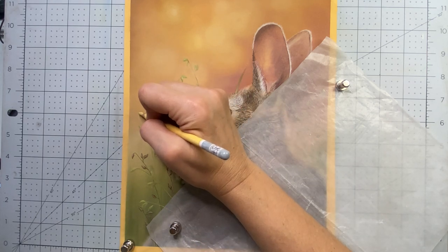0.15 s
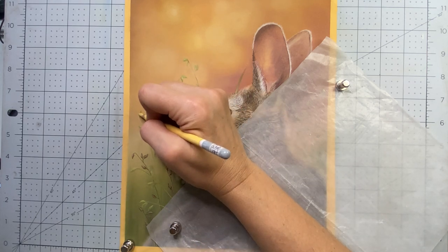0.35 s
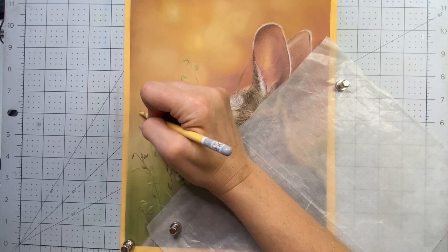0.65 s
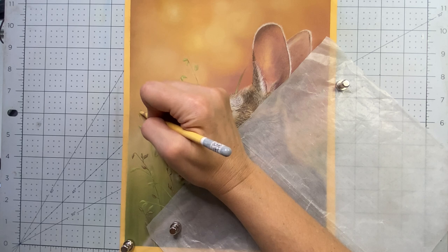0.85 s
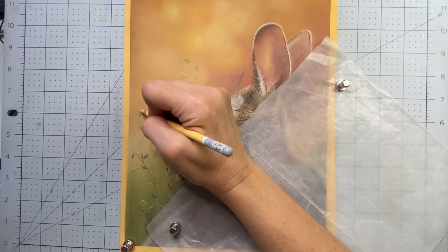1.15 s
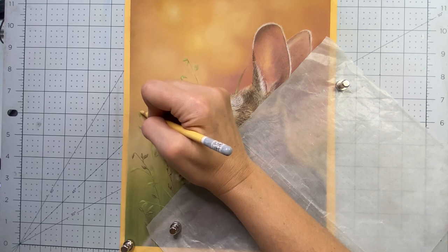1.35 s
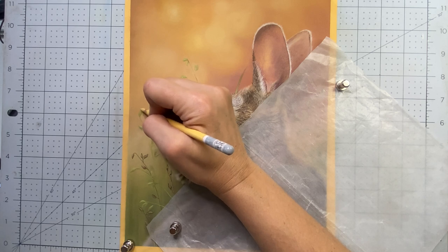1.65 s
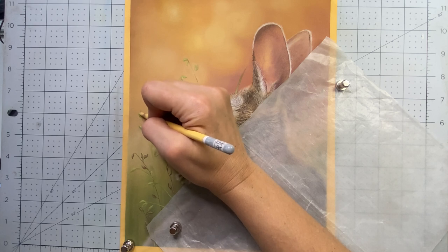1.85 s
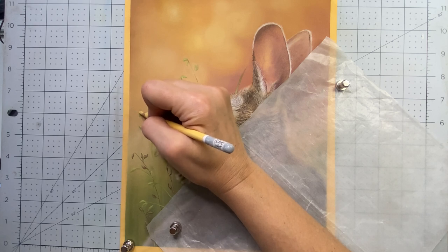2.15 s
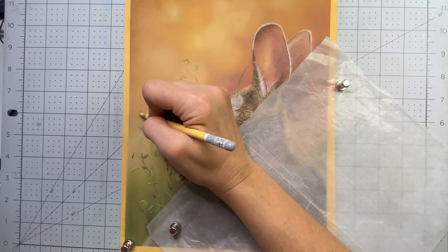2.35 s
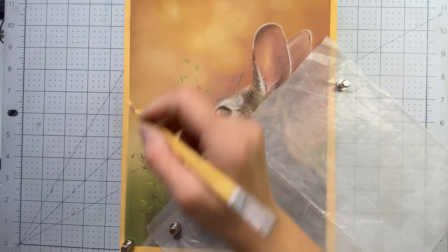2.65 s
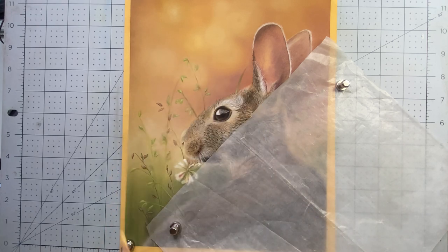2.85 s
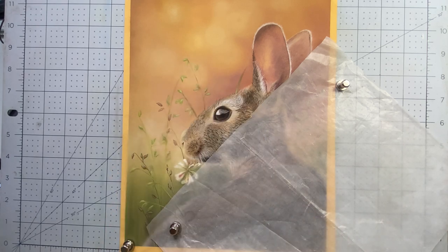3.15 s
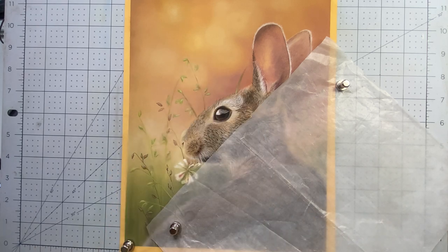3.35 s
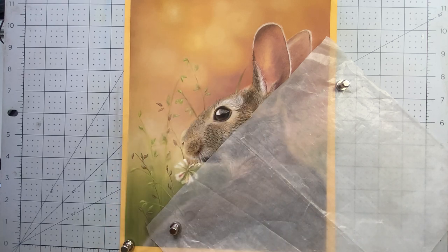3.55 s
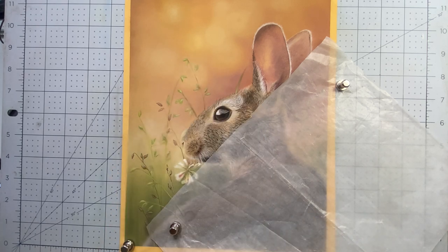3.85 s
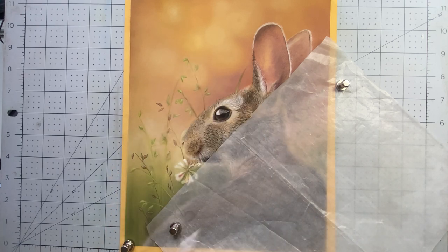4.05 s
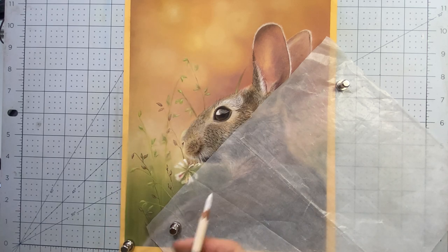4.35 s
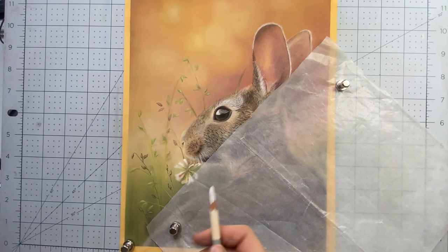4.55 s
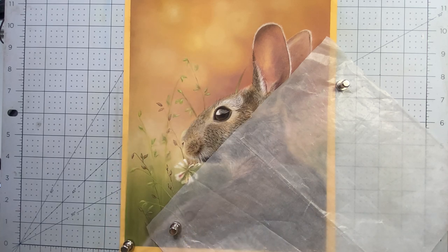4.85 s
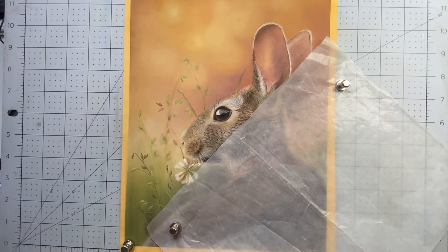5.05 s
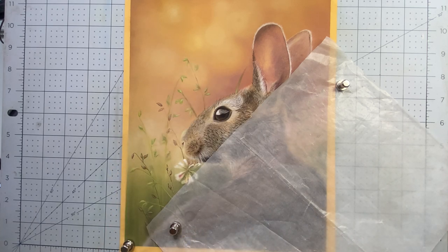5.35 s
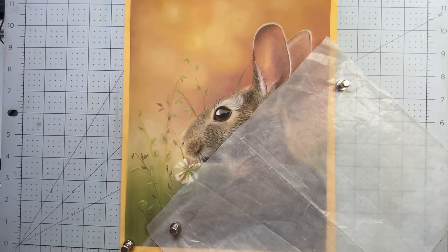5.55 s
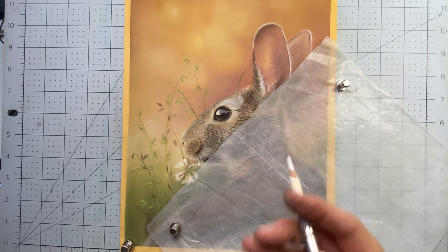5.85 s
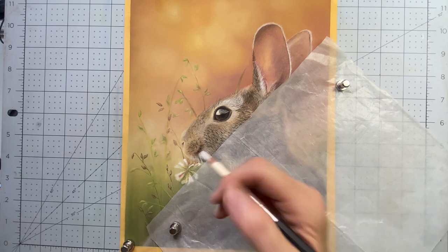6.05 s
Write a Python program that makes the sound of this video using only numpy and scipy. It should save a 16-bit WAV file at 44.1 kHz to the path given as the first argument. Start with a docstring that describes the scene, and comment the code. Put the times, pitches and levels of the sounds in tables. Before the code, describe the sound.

In a quiet small room with faint hiss and distant machine hum, a pastel pencil makes short, dry strokes on toothed paper, some squeaky. After about two and a half seconds the hand moves away, sliding over a thin cover sheet and clicking among wooden pencils. One drops with a sharp clack and bounces; soft desk thumps and lighter rummaging follow. Close stereo microphones.

```python
"""From start to end, machinery hums far away, a rough drone comes and goes, and a quiet room hisses: filtered noise.
First a pastel pencil touches down and makes short strokes on toothed paper, near two microphones: filtered grains.
Then the hand slides over a cover sheet and rummages among pencils: swelling grains and short ringing knocks.
The desk thumps softly under the arm: slow dying cycles. Midway a pencil drops and bounces: stronger knocks.
The rummaging goes on to the end. The near sounds, except the thumps, also get a short room echo."""
import sys
import numpy as np
from scipy import signal
from scipy.fft import rfft, irfft
from scipy.io import wavfile

SR = 44100
rng = np.random.default_rng(int(sys.argv[2]) if len(sys.argv) > 2 else 0)


def bounce(signal):
    """Save signal as a 16-bit WAV file at the path given by the first command-line argument."""
    frames = np.transpose(np.atleast_2d(signal))
    limited = np.clip(frames, -1, 1)
    pcm = np.round(limited * 32767).astype(np.int16)
    wavfile.write(sys.argv[1], SR, pcm)


N = 272538
TIME = np.arange(N) / SR

# Tone of the room's air noise: [f/Hz, level per Hz/dB]
AIR_TONE = [(15, -36), (28, -8), (64, -3), (200, -4), (309, -2), (607, -12), (860, -6), (1100, -12),
            (1890, -28), (3000, -32), (6500, -34), (8600, -40), (12500, -35), (14000, -39), (15200, -60)]
# How alike the air noise is at left and right, 1 same to -1 opposite: [f/Hz, likeness]
AIR_LIKENESS = [(60, 0.89), (130, 0.84), (290, -0.35), (640, -0.36), (1400, 0), (3000, 0.71), (15000, 0.29)]
# Level of the far low roll: [t/s, level/dB]
RUMBLE_LEVEL = [(0, -83.5), (.7, -74), (1.2, -85.5), (1.7, -95), (2.2, -81), (6.2, -87.5)]
# Machine hum: [f/Hz, rms level/dB, left phase lead/rad, wavering share, waver rate/Hz]
HUM_LINES = [(79.63, -86.5, .6, 0.66, 3.0), (119.7, -78.5, 0.7, 0.93, 1.7), (874, -71.5, 2.4, 0.54, 2.5),
             (1000, -88, 1.3, 1, 2.9), (1093, -81.5, 3.9, 0.45, 0.68)]
# Level of the rough drone: [t/s, rms level/dB]
DRONE_LEVEL = [(0, -80), (.98, -71), (1.74, -83), (2.49, -71), (3.5, -78), (3.9, -80.5), (4.61, -78.5),
               (5.23, -66.5), (6.18, -73.5)]
# Time the room noise takes to fall by 60 dB: [f/Hz, fall time/s]
ROOM_FALL = [(150, 0.33), (1000, 0.14), (2500, 0.17), (5000, 0.22), (11000, 0.022)]
# How much of each near source goes to the room: source name: level/dB
ROOM_SEND = {"pencil": -16.5, "hand": -7, "taps": -7, "drop": -6.5}
# Gain of the left microphone: [f/Hz, level/dB]
LEFT_GAIN = [(100, -2.5), (600, -1), (1600, -2.5), (7000, -7.5), (9500, 1)]
# Arm on the desk: [t/s, level/dB, f/Hz]
ARM_THUMPS = [(3.597, -55.5, 50), (4.28, -48.5, 47.6), (4.521, -50.5, 59.6), (5.777, -54.5, 63.8),
              (5.859, -54.5, 57.8), (6.088, -62, 46.2)]
# Skin sliding over the cover sheet: [start t/s, length/s, level/dB]
SKIN_SLIDES = [(2.55, 0.41, -70), (3.02, 0.17, -72), (3.27, 0.14, -71), (3.745, 0.064, -58),
               (3.86, 0.17, -64), (4.29, 0.063, -67), (4.44, 0.15, -65.5), (4.58, 0.21, -77),
               (5.39, .17, -75), (5.575, 0.13, -65), (5.7, 0.33, -76.5), (6.01, 0.18, -69)]
# Pencil scraping on pencil: [start t/s, length/s, level/dB]
PENCIL_SCRAPES = [(2.498, 0.07, -63), (3.208, 0.083, -69.5), (3.53, 0.29, -66), (3.745, 0.073, -55.5),
                  (3.86, .125, -56.5), (3.99, 0.065, -45.5), (4.089, 0.052, -43.5), (4.29, 0.097, -57.5),
                  (5.033, 0.094, -62.5), (5.39, 0.15, -74.5), (6.01, 0.098, -72)]
# Pencil dragged along the desk: [start t/s, length/s, level/dB]
DESK_DRAGS = [(2.498, 0.14, -63.5), (3.87, 0.15, -61.5), (4.089, .067, -70), (4.29, 0.074, -45),
              (4.46, 0.16, -69), (5.033, 0.1, -59.5)]
# Tone of skin on the sheet: [f/Hz, level per Hz/dB]
SHEET_TONE = [(2000, -31.5), (4300, -17), (6400, -8.5), (8600, -20.5), (10600, 4), (12200, -4.5),
              (14300, -6), (15200, -26)]
# Tone of pencil on pencil: [f/Hz, level per Hz/dB]
SCRAPE_TONE = [(900, -27), (1800, -6), (2500, -4.5), (5000, 2.5), (7000, -4.5), (9000, -22.5)]
# Tone of pencil on desk: [f/Hz, level per Hz/dB]
DRAG_TONE = [(150, -22.5), (300, -4.5), (500, -3), (1000, -2.5), (1500, -7), (2500, -24)]
# Pencil knocks: the tip touching down, then pencils tapping each other and the desk:
# [t/s, level/dB, crack centre f/Hz]
PENCIL_KNOCKS = [(0.0318, -47, 4520), (2.4833, -46, 1060), (2.5121, -35.5, 4100), (2.5262, -34, 2050),
                 (2.5365, -35.5, 4550), (2.6394, -52.5, 2900), (2.8398, -34.5, 4630), (3.171, -57, 8500),
                 (3.2104, -41.5, 1770), (3.2747, -46, 4100), (3.302, -54, 3500), (3.3402, -32, 3060),
                 (3.4525, -55.5, 7900), (3.5336, -41.5, 3030), (3.5724, -30, 4060), (3.6056, -31.5, 3000),
                 (3.6518, -31.5, 3250), (3.677, -43.5, 6200), (3.7423, -35, 4340), (3.8621, -42, 2190),
                 (3.8816, -29.5, 5000), (3.9797, -34, 2920), (4.012, -49.5, 5150), (4.0305, -22, 4580),
                 (4.0438, -30, 4550), (4.093, -32.5, 2660), (4.1111, -29.5, 6940), (4.368, -8.5, 5910),
                 (4.3732, -26, 5600), (4.4518, -36.5, 5870), (4.4868, -42.5, 1280), (4.8552, -48, 1440),
                 (5.035, -36, 5300), (5.0903, -44, 3270), (5.1667, -43, 3764), (5.3303, -49.5, 2600),
                 (5.4882, -42.5, 2720), (5.8194, -54.5, 2090), (5.861, -52.5, 2010), (5.96, -51.5, 2230),
                 (6.0151, -36, 2460), (6.0254, -49, 1780), (6.0801, -38.5, 1334), (6.0992, -35.5, 3600)]
# A loose pencil drops and bounces: [t/s, level/dB, crack centre f/Hz]
PENCIL_DROP = [(4.1536, -26, 2630), (4.1869, -2.5, 2390), (4.2872, -29, 2100), (4.3019, -33.5, 2200)]
# Ringing tones of the wooden pencil: [f/Hz, level/dB, time to fall 60 dB/s]
PENCIL_TONES = [(1038, -9.5, 0.031), (1367, -10, 0.031), (1978, -19.5, 0.044), (2024, -6.5, 0.033),
                (2362, -3, 0.044), (3330, -12, 0.031), (4180, -15.5, .02), (5150, -14.5, 0.047),
                (7040, -23, .02)]
# Ringing tones of the desk: [f/Hz, level/dB, time to fall 60 dB/s]
DESK_TONES = [(195, 1, 0.04), (319, -4, 0.062), (470, -16, 0.24), (563, -10, 0.048), (709.5, -5.5, 0.023),
              (836, -1, 0.034)]
# Pencil strokes, light return ones squeak more: [start t/s, length/s, grit level/dB, squeak level/dB]
PENCIL_STROKES = [(0.011, 0.092, -68, -76.5), (0.134, 0.067, -76.5, -56.5), (0.233, 0.083, -64.5, -67),
                  (0.338, 0.07, -70, -60.5), (0.439, 0.081, -64.5, -75.5), (0.552, 0.067, -71, -62.5),
                  (0.652, 0.079, -67.5, -79), (0.782, 0.069, -63.5, -84), (0.889, .11, -66.5, -77),
                  (1.033, 0.075, -63, -68.5), (1.165, 0.06, -82.5, -65.5), (1.336, 0.07, -64.5, -76),
                  (1.574, 0.06, -72.5, -54), (1.695, 0.12, -73, -52), (1.945, 0.086, -65, -67.5),
                  (2.155, 0.089, -67, -64), (2.366, 0.049, -71, -50)]
# Tone of the paper grit: [f/Hz, level per Hz/dB]
GRIT_TONE = [(900, -45), (1500, -9.5), (2800, -9.5), (3700, -7.5), (5200, -1.5), (6200, -10.5), (8500, -20),
             (10300, -12.5), (14200, -11), (14900, -34.5)]
# Tone of the squeaking tip: [f/Hz, level per Hz/dB]
SQUEAK_TONE = [(2800, -32), (3700, -13), (5400, -9), (5800, -1), (6800, 0), (7200, -14), (8500, -22),
               (10000, -40)]
# Resonances of the board under the paper: [f/Hz, width/Hz, level/dB]
BOARD_TONES = [(1730, 150, 29), (1420, 450, -12)]

AIR_DB = -69.5
DRONE_HZ, DRONE_LEAD_RAD, DRONE_WAVER_HZ = 301, 0.83, 26
CUTOFF_HZ = 16800
# How much later the left microphone hears each source; below zero means earlier
PAPER_LAG_S, DESK_LAG_S, DROP_LAG_S, THUMP_LAG_S = 0.0001, -0.00014, 0.00001, 0.0043
THUMP_RISE_S = 0.025
# Share of a movement spent speeding up
SLIDE_RISE, SCRAPE_RISE, DRAG_RISE, STROKE_RISE = 0.3, 0.31, 0.05, 0.68
SKIN_LAW = 0.28   # skin hiss grows as this power of speed
FINGERS_DB = -8   # skin hiss of the fingers that scrape pencils, relative to the scrape
CRACK_SPAN = 1.514   # a crack spans this factor below and above its centre
CONTACT_DB, CONTACT_T60_S = -10.5, 0.017   # short ring at the centre of the crack
TICK_CENTRE_HZ, TICK_TOP_HZ = 10300, 13500   # band of the lacquer tick
TICK_DB_PER_OCTAVE = -2   # low cracks carry a relatively stronger tick
LIFT_START_S, LIFT_END_S = 3.55, 4.14   # the pencils are held off the desk
LIFTED_THUD_DB = -19.5   # so the desk answers this much less
THUD_LAG = 0.37   # dB of thud that a blow lacks for each dB of extra strength
BOARD_DB = -10   # the board follows the pressure, this far below the grit


def amp(db):
    """Turn decibels into gain."""
    return 10 ** (np.asarray(db) / 20)


def rms_one(x):
    """Scale to an rms (average strength) of 1."""
    return x / np.sqrt(np.mean(x ** 2) + 1e-30)


def frequencies(count):
    """Frequencies of a spectrum, kept at 1 Hz or more so their logarithm exists."""
    return np.maximum(np.fft.rfftfreq(count, 1 / SR), 1)


def at_hz(points, hz):
    """Read a table between its points, along a log-frequency axis."""
    table = np.array(points)
    return np.interp(np.log(hz), np.log(table[:, 0]), table[:, 1])


def over_time(points):
    """Read a table of times and levels at every sample."""
    return np.interp(TIME, *np.transpose(points))


def colour(x, tone):
    """Filter a white signal to a given tone, with rms 1."""
    count = x.shape[-1]
    return rms_one(irfft(rfft(x) * amp(at_hz(tone, frequencies(count))), count))


def band_filter(order, low_hz, high_hz):
    """Make a filter that passes one band."""
    return signal.butter(order, [low_hz, high_hz], "band", fs=SR, output="sos")


def drift(rate_hz):
    """Smooth random wandering of rms 1, from twice-smoothed noise."""
    r = np.exp(-2 * np.pi * rate_hz / SR)
    wander = signal.lfilter([1], [1, -2 * r, r * r], rng.standard_normal(N + SR))
    return rms_one(wander[SR:])   # skip the second in which the filter settles


def ring(clicks, hz, t60):
    """A unit click starts a sine that falls by 60 dB in t60 seconds."""
    r, w = amp(-60 / (t60 * SR)), 2 * np.pi * hz / SR
    return signal.lfilter([0, np.sin(w)], [1, -2 * r * np.cos(w), r * r], clicks + 1e-18)


def grains(per_s, spread_db):
    """Rubbing as random clicks of uneven size, with rms 1."""
    sizes = amp(spread_db * np.minimum(rng.exponential(1, N), 5))
    signs = rng.choice([-1, 1], N)
    return rms_one(sizes * signs * (rng.random(N) < per_s / SR))


def swell(start, length, rise):
    """Speed of one movement, from rest up to 1 and back to rest."""
    phase = np.interp(TIME - start, [0, rise * length, length], [0, np.pi / 2, np.pi])
    return np.sin(phase).clip(0)


def moves(rows, rise, law=1):
    """Movements get louder with a power of their speed."""
    return sum(amp(db) * swell(start, length, rise) ** law for start, length, db in rows)


def place(x, lag_s):
    """Two microphones hear one source at different times: left is delayed by the lag."""
    turn = np.exp(-2j * np.pi * np.fft.rfftfreq(N, 1 / SR) * lag_s)
    return np.array([irfft(rfft(x) * turn, N), x])


def air():
    """Broad room noise, alike or opposed at the two microphones depending on the band, and a low roll."""
    alike = at_hz(AIR_LIKENESS, frequencies(N))
    mid, side = rfft(rng.standard_normal((2, N)))
    white = irfft(np.sqrt(1 + alike) * mid + np.sqrt(1 - alike) * side * [[1], [-1]], N)
    rumble = colour(white, [(30, -30.0), (60, 1.5), (85, 0.5), (130, -28)])   # f/Hz, level per Hz/dB
    return amp(AIR_DB + 0.8 * drift(3)) * colour(white, AIR_TONE) + amp(over_time(RUMBLE_LEVEL)) * rumble


def hum():
    """Machine tones, most partly steady, and a rough drone that wavers entirely in strength and phase."""
    out = np.zeros((2, N))
    drone = (DRONE_HZ, over_time(DRONE_LEVEL), DRONE_LEAD_RAD, 1, DRONE_WAVER_HZ)
    for hz, db, lead, share, rate_hz in HUM_LINES + [drone]:
        steady = np.sqrt(2 - 2 * share ** 2)
        waver = steady + share * (drift(rate_hz) + 1j * drift(rate_hz))
        phase = 2 * np.pi * hz * TIME + np.array([[lead], [0]])
        out += amp(db) * np.real(waver * np.exp(1j * phase))
    return out


def room(x):
    """Echo as noise that dies band by band, unrelated at the two microphones."""
    t = TIME[:SR // 2]
    tail = np.zeros((2, len(t)))
    for low in 100 * 2. ** np.arange(8):
        high = min(2 * low, 0.45 * SR)
        band = signal.sosfilt(band_filter(2, low, high), rng.standard_normal((2, len(t))))
        tail += band * amp(-60 * t / at_hz(ROOM_FALL, np.sqrt(low * high)))
    tail *= np.clip((t - 0.002) / 0.0044, 0, 1)   # the nearest surfaces answer first
    tail /= np.sqrt(np.sum(tail ** 2) / 2)
    return signal.fftconvolve(x[None], tail, axes=1)[:, :N]


def thumps():
    """Soft pushes of the arm on the desk: slow cycles that swell and die."""
    out = np.zeros(N)
    for start, db, hz in ARM_THUMPS:
        t = np.maximum(TIME - start, 0) / THUMP_RISE_S
        out += amp(db) * t * np.exp(1 - t) * np.sin(2 * np.pi * hz * (TIME - start))
    return out


def handling():
    """Skin hisses over the sheet; pencils scrape each other and the desk in clumps of grains."""
    skin = colour(grains(10000, 3.0) * amp(2.0 * drift(40)), SHEET_TONE)
    catches = grains(1500, 4.2) * amp(3.5 * drift(60))
    scraping = moves(PENCIL_SCRAPES, SCRAPE_RISE)
    skin_level = moves(SKIN_SLIDES, SLIDE_RISE, SKIN_LAW) + amp(FINGERS_DB) * scraping
    out = skin_level * skin
    out += scraping * colour(catches, SCRAPE_TONE)
    return out + moves(DESK_DRAGS, DRAG_RISE) * colour(catches, DRAG_TONE)


def ring_body(blow, tones):
    """A blow rings all tones of a body, with alternating signs."""
    return sum((-1) ** k * amp(db) * ring(blow, hz, t60) for k, (hz, db, t60) in enumerate(tones))


def knocks(events, crack_s, ring_db, tick_db, thud_db):
    """Each contact is a burst of tiny slips: a crack, a tick, ringing wood and a knock of the desk."""
    out, t = np.zeros(N), TIME[:SR // 5]
    tick_filter = band_filter(2, TICK_CENTRE_HZ ** 2 / TICK_TOP_HZ, TICK_TOP_HZ)
    blow = np.zeros(len(t))
    blow[round(crack_s * SR)] = 1   # one click where the burst's envelope peaks
    wood, desk = ring_body(blow, PENCIL_TONES), ring_body(blow, DESK_TONES)
    for start, db, hz in events:
        burst = rng.standard_normal(len(t)) * t / crack_s * np.exp(1 - t / crack_s)
        crack = signal.sosfilt(band_filter(1, hz / CRACK_SPAN, hz * CRACK_SPAN), burst)
        tick = signal.sosfilt(tick_filter, burst)
        tick_level = tick_db + TICK_DB_PER_OCTAVE * np.log2(hz / 3000)
        lifted = LIFT_START_S < start < LIFT_END_S
        thud_level = thud_db - THUD_LAG * db + LIFTED_THUD_DB * lifted
        sound = crack / np.abs(crack).max()
        sound += amp(CONTACT_DB) * ring(blow, hz, CONTACT_T60_S)
        sound += amp(tick_level) * tick / np.abs(tick).max()
        sound += amp(ring_db) * wood + amp(thud_level) * desk
        first = round(start * SR)
        out[first:first + len(t)] += amp(db) * sound[:N - first]
    # small bodies radiate no bass, wood no far treble
    return signal.sosfilt(band_filter(2, 150, 13000), out)


def shake_board(x):
    """The board resonates at several tones side by side, with rms 1."""
    out = np.zeros(N)
    for hz, width, db in BOARD_TONES:
        out += amp(db) * np.sqrt(width) * ring(x, hz, np.log(1000) / (np.pi * width))
    return rms_one(out)


def drawing():
    """The tip trips over the tooth of the paper; the same grains shake the tip and the board."""
    tooth = grains(12000, 2.5) * amp(1.2 * drift(80))
    grit, squeak, board = colour(tooth, GRIT_TONE), colour(tooth, SQUEAK_TONE), shake_board(tooth)
    out = np.zeros(N)
    for start, length, grit_db, squeak_db in PENCIL_STROKES:
        speed = swell(start, length, STROKE_RISE)
        out += np.cbrt(speed) * amp(grit_db) * grit   # grit sounds as soon as the tip moves
        out += speed * amp(grit_db + BOARD_DB) * board
        out += speed ** 0.93 * amp(squeak_db) * squeak
    return out


def scene():
    """Near sounds and their room echo, over the background of air and hum."""
    hand, pencil = handling(), drawing()
    contacts = knocks(PENCIL_KNOCKS, 0.00084, ring_db=-31, tick_db=-5.5, thud_db=-38.5)
    drop = knocks(PENCIL_DROP, 0.00088, ring_db=-6, tick_db=-12.5, thud_db=-29)
    near = place(pencil, PAPER_LAG_S) + place(hand + contacts, DESK_LAG_S) + place(drop, DROP_LAG_S)
    sources = {"pencil": pencil, "hand": hand, "taps": contacts, "drop": drop}
    to_room = sum(amp(ROOM_SEND[name]) * x for name, x in sources.items())
    return air() + hum() + place(thumps(), THUMP_LAG_S) + room(to_room) + near


def record(dry):
    """The left microphone has its own tone; both lose the top treble."""
    left = irfft(rfft(dry[0]) * amp(at_hz(LEFT_GAIN, frequencies(N))), N)
    top_cut = signal.cheby2(14, 90, CUTOFF_HZ, fs=SR, output="sos")
    return signal.sosfilt(top_cut, [left, dry[1]])


dry = scene()
out = record(dry)
bounce(out)
```